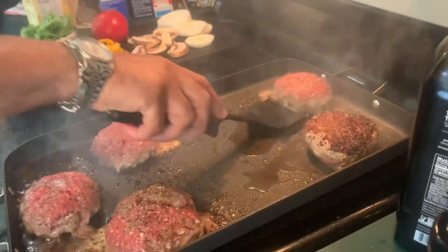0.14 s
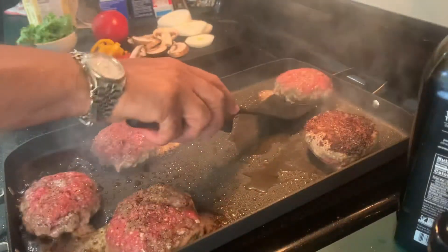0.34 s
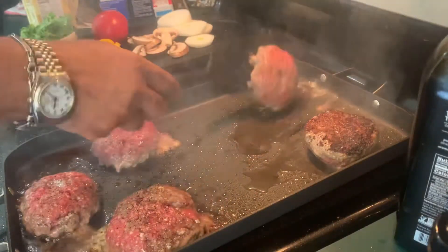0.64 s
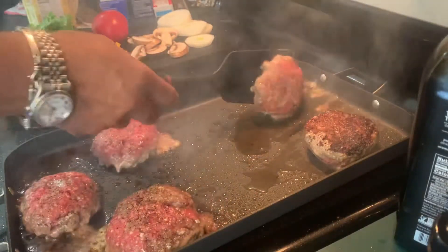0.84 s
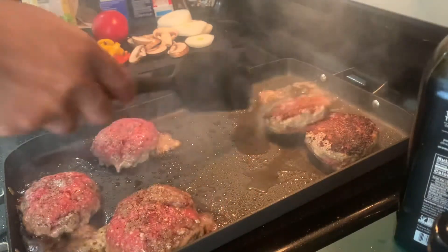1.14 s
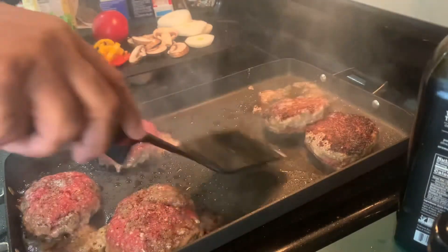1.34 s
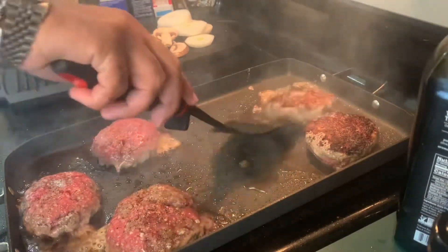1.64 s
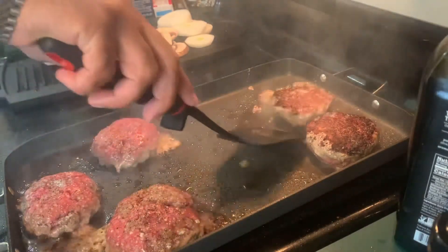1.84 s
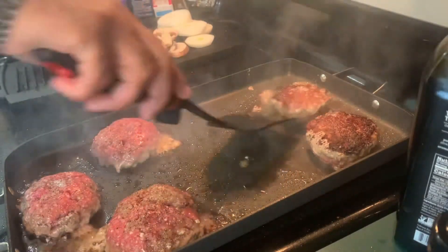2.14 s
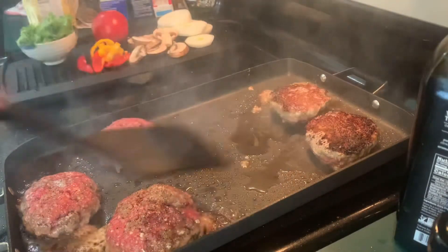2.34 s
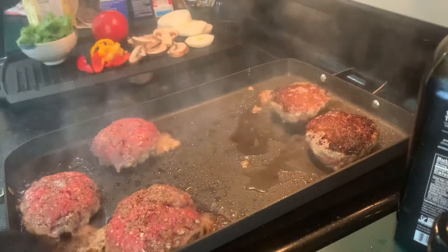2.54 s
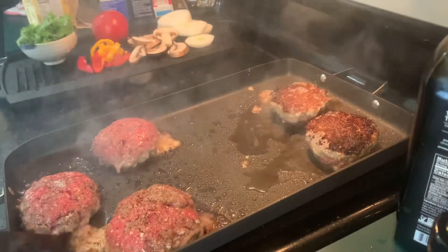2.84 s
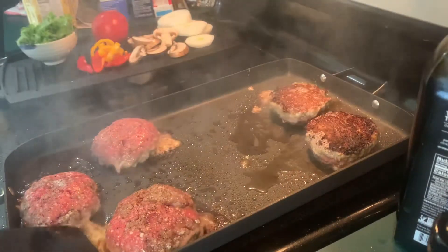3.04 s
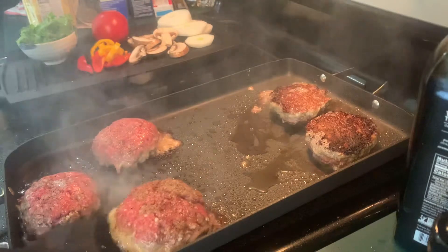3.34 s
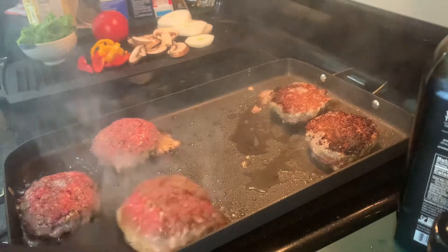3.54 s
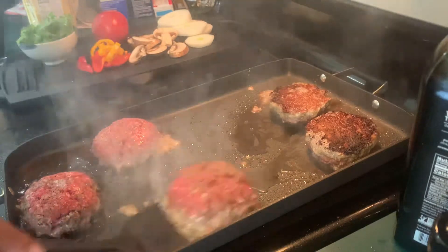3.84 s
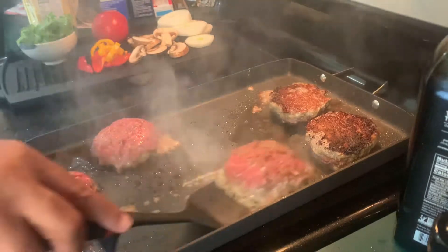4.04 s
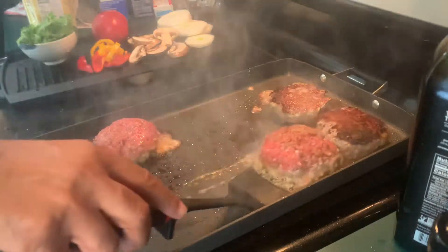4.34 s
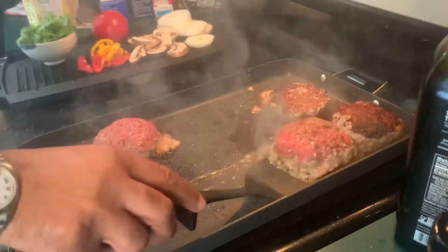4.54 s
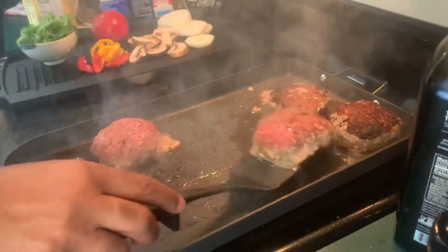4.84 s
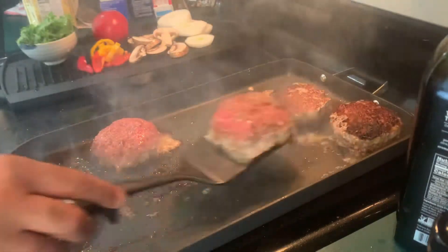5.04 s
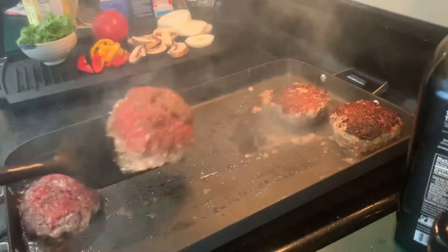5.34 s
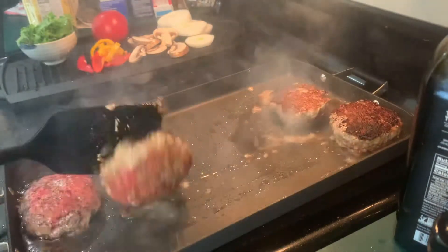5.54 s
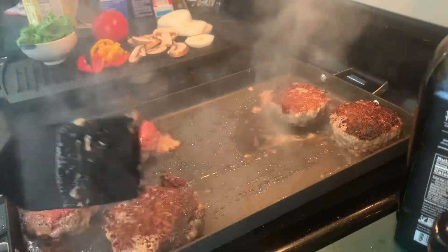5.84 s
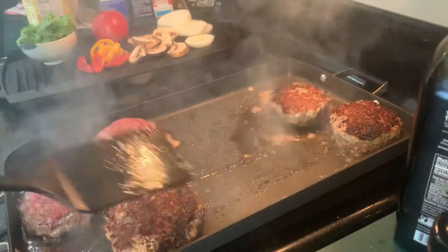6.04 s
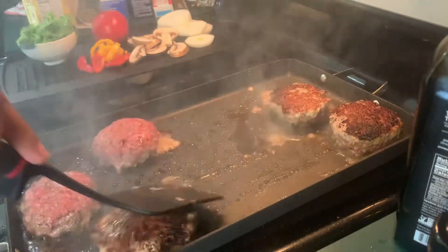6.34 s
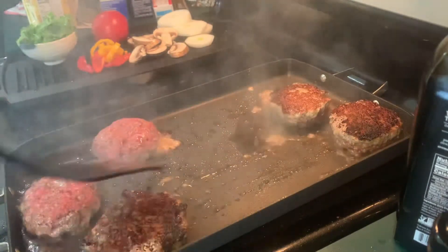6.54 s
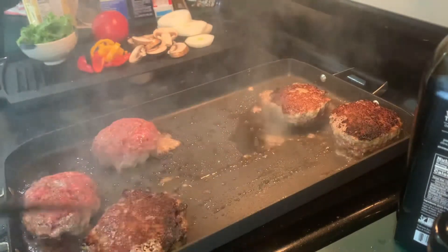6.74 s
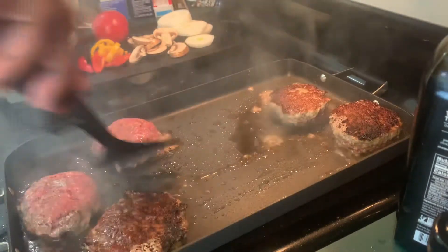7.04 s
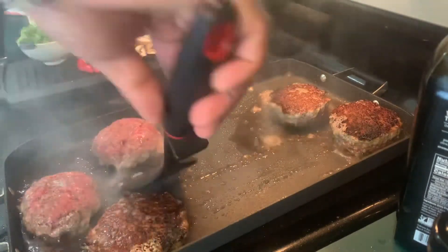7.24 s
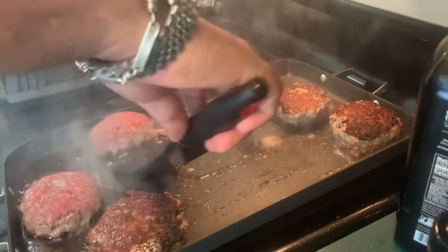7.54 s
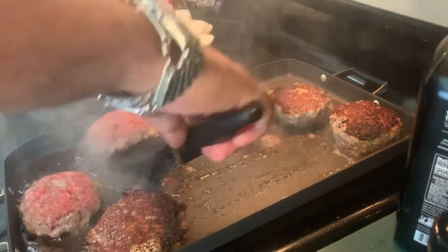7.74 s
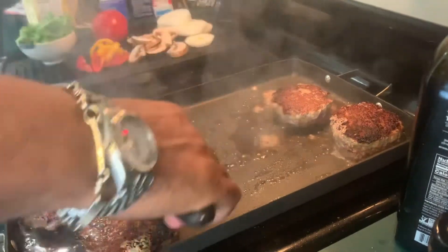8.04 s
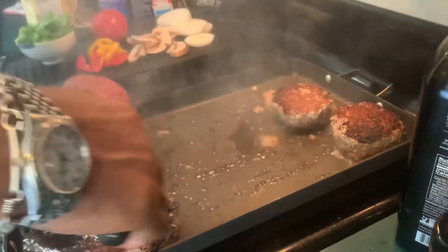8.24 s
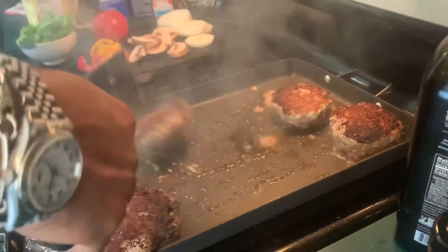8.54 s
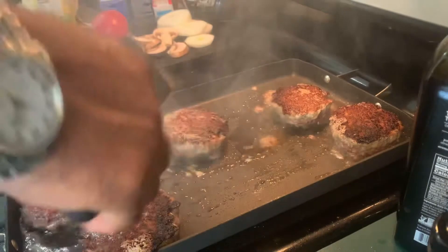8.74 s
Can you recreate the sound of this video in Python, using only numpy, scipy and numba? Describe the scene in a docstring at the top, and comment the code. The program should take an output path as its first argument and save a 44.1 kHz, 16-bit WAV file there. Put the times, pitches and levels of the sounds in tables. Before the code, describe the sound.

Meat patties sizzle fiercely on a hot griddle, fat spitting and crackling, with a spatula knock, scraping slide and bright steamy gushes over a humming hood.

```python
"""Meat patties sizzle on a hot griddle: thousands of steam bubbles burst in the fat as short swelling
sines, over filtered noise for the steady hiss; the largest spit out loud.
A kitchen hood adds shaped noise, duct resonances and mains hum. A spatula knock excites plate modes,
its slide under the meat is band-filtered noise, and juice on bare metal gushes as decaying bright noise.
One close microphone feeds both channels."""
import sys
import numpy as np
from scipy import signal
from scipy.fft import rfft, irfft, next_fast_len
from scipy.io import wavfile
from scipy.ndimage import uniform_filter1d
from numba import njit

SR = 44100
rng = np.random.default_rng(int(sys.argv[2]) if len(sys.argv) > 2 else 0)


def generate_wav(sig):
    """Save sig (samples, or channels by samples) to the path in sys.argv[1] as 16-bit PCM at SR."""
    pcm = np.round(np.clip(np.atleast_2d(sig).T, -1, 1) * 32767).astype(np.int16)
    wavfile.write(sys.argv[1], SR, pcm)


N = 392049
T = np.arange(N) / SR  # t/s

# boiling fat by bubble size, used about each column's mean:
# (t/s, middle bubbles level/dB, large bubbles above them level/dB, fine spray above them level/dB)
BOIL = [(0.0, -23.5, -3.5, 2.5), (0.6, -24, -9, 0), (0.89, -22, -8.5, 0.5), (1.14, -24, -7.5, -1),
        (1.65, -24, -6, 1.5), (2.42, -25, -7.5, 0.5), (3.1, -25, -5.5, 1.5), (3.6, -23, -5.5, 0.5),
        (4.06, -20.5, -5, -1), (4.33, -24, -2, 0.5), (5.25, -23, -7, 0.5), (5.7, -23.5, -3.5, 2),
        (6.38, -22.5, -6, 0), (6.9, -22.5, -6, 0), (7.45, -22, -5.5, -0.5), (8.3, -24, -4, 0.5),
        (8.62, -21, -5.5, -1), (8.89, -22, -4.5, -1)]
# pitches of large bubbles, middle bubbles and fine spray: (f/Hz, f/Hz, f/Hz)
BUBBLE_SIZE_HZ = (3500, 6800, 12000)
# relative spectrum of bubbles and steam: (f/Hz, level/dB per Hz)
SIZZLE = [(1000, -14), (1500, -6.5), (2200, -10.5), (3200, -6.5), (4500, -2.5), (5300, -1.5), (7600, 1),
          (10700, 0.5), (14000, 0.5), (15700, -1.5)]
# colouring by the raised rim and the microphone: (f/Hz, gain/dB)
RIM = [(2050, -2), (2250, -1.5), (2450, 1), (3250, 1), (3550, -0.5), (3850, 0), (4600, -1.5), (5150, 0),
       (5900, 0.5), (6200, -.5), (7500, 1.17), (11000, -1.5), (14000, -0.5), (15600, 1)]
# air pockets between meat and plate: (f/Hz, width/Hz, gain/dB)
POCKETS = [(2740, 120, -5.5), (3850, 210, -6.5), (5180, 330, -6.5)]
# reflections from rim, backsplash, hood and wall: (delay/ms, gain/dB)
ECHOES = [(2.6, -9), (6.2, -9.5), (11, -9), (19, -21)]

# relative spectrum of the hood's air rush: (f/Hz, level/dB per Hz)
HOOD_AIR = [(25, -30), (45, -21), (80, -23), (140, -11.5), (250, -8.5), (280, -17), (330, -13), (560, -14),
            (620, -11.5), (1200, -13), (2200, -16.5), (4000, -15), (6000, -44)]
HOOD_AIR_DB = -34  # rms
# resonances of the hood duct: (f/Hz, width/Hz, rms level/dB)
HOOD_DUCT = [(107.5, 21, -43), (174, 20, -52.5), (202.5, 12.6, -45.5), (628, 70, -51.5), (744, 90, -54),
             (976, 22, -50), (1148, 24, -50.5), (1363, 41, -46.5), (1555, 63, -49), (2010, 130, -45)]
# mains hum of the motor, about which each level wavers: (f/Hz, rms level/dB)
HOOD_HUM = [(120, -44.5), (240, -46.5), (360, -64), (480, -57), (600, -54), (720, -66)]

# loudest spits of fat, before pockets, echoes and rim: (t/s, peak level/dB, starting f/Hz)
SPITS = [(0.0933, -12, 4890), (0.1877, -9, 6980), (0.2726, -8, 4970), (0.514, -9.5, 5410),
         (0.6754, -9, 5700), (1.2784, -6, 4890), (1.3459, -6, 6630), (1.3855, -12, 4890),
         (1.5299, -8, 5140), (2.1363, -8, 5410), (2.1681, -8, 6310), (2.3533, -12, 5140),
         (2.4211, -11, 4650), (2.428, -9, 5140), (2.4796, -18, 2670), (2.5507, -12, 5700),
         (3.5277, -6, 5990), (4.0453, -12, 3600), (5.1428, -7, 5990), (5.2352, -7, 5410),
         (5.5204, -11, 4400), (5.6406, -13, 2940), (5.6797, -14, 3090), (5.7608, -8, 8550),
         (5.7973, -11, 5140), (5.841, -8, 4650), (5.9803, -11, 9000), (5.995, -13, 3990),
         (6.0062, -11, 3580), (6.1019, -6, 8550), (6.2329, -8, 7730), (6.3403, -10, 4700),
         (6.4017, -9, 5200), (6.4728, -6, 5140), (6.5326, -8.5, 4650), (6.6416, -8, 4890),
         (6.6587, -7, 5140), (6.6895, -9, 4890), (6.7959, -7, 3990), (6.8567, -7, 7730), (6.8798, -7, 3920),
         (6.9622, -5, 5140), (7.0527, -8, 5140), (7.0775, -10, 4650), (7.2685, -11, 4420),
         (7.3207, -8, 5140), (7.3974, -6, 5700), (7.4485, -9, 4450), (7.4656, -15, 3260),
         (7.4821, -10, 5410), (7.503, -9, 4670), (7.7722, -11.5, 2940), (7.7777, -7, 5700),
         (7.9151, -11, 4650), (8.347, -6, 9000), (8.427, -15, 2960)]
# further spits at random, in busier and calmer spells: (from t/s, to t/s, rate/s^-1)
SPATTER = [(0, 1.3, 7), (1.3, 2.9, 15), (2.9, 5.1, 1), (5.1, 6.9, 14), (6.9, 8.89, 3)]
SPATTER_DB, SPATTER_SPREAD_DB, SPATTER_HZ, SPATTER_OCTAVES = -16, 3, 4700, .12
SPIT_CYCLES = 1.09  # cycles to swell

# spatula striking the plate and rebounding: (t/s, relative strength/dB, push length/ms)
KNOCKS = [(.719, -2.5, 0.36), (.7234, -6.5, 0.68), (.7288, -7, 1.2), (.7385, -9, 0.83), (.746, -17, 1.2)]
# modes of blade and plate: (f/Hz, relative level/dB, t60/s)
PLATE = [(331, -6.5, 0.094), (444, -14.5, 0.13), (554, -11, 0.12), (636, -18, 0.084), (753, -8, 0.16),
         (776, -10, 0.19), (890, -22, 0.094), (1040, -8, 0.09), (1220, -13, 0.049), (1366, 1.5, 0.039),
         (1554, 6, 0.024), (1700, 2.5, 0.029), (1910, 4, 0.019), (2570, 0.5, .015)]
# the kitchen's rough after-ring: (f/Hz, width/Hz, level/dB, t60/s)
KNOCK_TAIL = [(756, 130, -27.5, 0.41), (1300, 900, -20, 0.075)]

# spatula sliding on the plate, with a hard shove under the patty: (t/s, level/dB)
SLIDE = [(3.08, -44), (3.74, -38), (3.96, -30.5), (4.18, -35.5), (4.84, -35.5), (5.28, -55)]
# bands in which the sliding blade sings: (f/Hz, width/Hz, relative level/dB)
SLIDE_BODY = [(1430, 210, -0.5), (1750, 280, -5), (1950, 170, 2.5), (905, 690, -5)]

# juice meeting bare hot metal: (t/s, hiss level/dB, centre f/Hz, t60/s, first flash above hiss level/dB)
GUSHES = [(5.418, -18, 9500, 0.7, 1), (7.045, -23, 8000, 0.44, -6), (8.408, -21, 8000, 0.8, -12)]
FLASH_T60_S = .07  # fade of the first flash of steam

TOP_HZ = 15720  # upper cutoff


def undb(db):
    """Amplitude ratio from its logarithmic level in dB."""
    return 10 ** (np.asarray(db) / 20)


def level(x, db):
    """Root-mean-square normalisation to a level in dB."""
    return x * undb(db) / np.sqrt(np.mean(x ** 2))


def shape(table, hz):
    """Spectral level in dB by interpolation on a logarithmic frequency axis."""
    f, db = np.transpose(table)
    return np.interp(np.log(np.maximum(hz, 1)), np.log(f), db)


def colour(x, db_of_hz):
    """Linear filtering: each Fourier component is scaled by a gain in dB."""
    size = next_fast_len(N)
    hz = np.arange(size // 2 + 1) * SR / size
    return irfft(rfft(x, size) * undb(db_of_hz(hz)), size)[:N]


def band(x, hz, width):
    """Second-order resonance, whose sharpness is centre frequency over bandwidth."""
    return signal.lfilter(*signal.iirpeak(min(hz, .45 * SR), hz / width, fs=SR), x)


def walk(rate):
    """Slow random fluctuation: levels held 1 / rate s and averaged twice; spread near 1."""
    hold = int(SR / rate)
    steps = np.repeat(rng.standard_normal(N // hold + 1), hold)
    return 1.3 * uniform_filter1d(uniform_filter1d(steps, hold), hold)[:N]


@njit
def rings(n, start, turn, swell, glide, size):
    """Transient oscillation: a sine swells for the given samples, then decays; its pitch glides up."""
    out = np.zeros(n)
    for k in range(len(start)):
        i, w = int(start[k]) + 1, turn[k]
        age = i - start[k]
        phase = w * age
        fade = np.exp(-1 / swell[k])
        # scaled so that the envelope peaks at size when age equals swell
        a = size[k] * np.exp(1 - age / swell[k]) / swell[k]
        while age < 7 * swell[k] and i < n:
            out[i] += a * age * np.sin(phase)
            phase += w
            w = min(w * glide[k], 2.8)
            a *= fade
            age += 1
            i += 1
    return out


def bubbles(s, hz, cycles, size, rise):
    """Bubble resonance: pitch rises by the share rise as the bubble opens over the given cycles."""
    swell = np.maximum(cycles, .4) * SR / hz
    return rings(N, s * SR, 2 * np.pi * hz / SR, swell, (1 + rise) ** (1 / swell), size)


def boil_db(s, hz):
    """Boiling activity by bubble size: level about its mean at a moment and a pitch."""
    t, mid, large, fine = np.transpose(BOIL)
    columns = (mid + large, mid, mid + fine)
    large_db, mid_db, fine_db = (np.interp(s, t, c - np.mean(c)) for c in columns)
    # -1 for large bubbles, 0 for middle ones, 1 for fine spray
    x = np.interp(np.log(hz), np.log(BUBBLE_SIZE_HZ), [-1, 0, 1])
    return mid_db + np.maximum(-x, 0) * (large_db - mid_db) + np.maximum(x, 0) * (fine_db - mid_db)


def crackle(count, lo_hz, hi_hz, scatter_db, cycles, db):
    """Random bubble bursts: a few exceed the rest, up to a fixed limit."""
    when, pitch, rarity, span = rng.random((count, 4)).T
    s = when * N / SR
    hz = lo_hz * (hi_hz / lo_hz) ** pitch
    extra_db = scatter_db * np.minimum(-np.log(1 - rarity), 4)
    size_db = shape(SIZZLE, hz) + 20 * np.log10(hz / 5000) + boil_db(s, hz) + extra_db
    return level(bubbles(s, hz, cycles * (.5 + span), undb(size_db), 0.029), db)


def steam(swell_db, flicker_db, db):
    """Turbulent hiss: third-octave noise bands sputter together and flicker alone."""
    out, swell = 0, walk(25)
    for hz in 1600 * 2 ** np.arange(0, 3.4, 1 / 3):
        noise = rng.standard_normal(N)
        noise = band(band(noise, hz, hz / 3), hz, hz / 3)
        band_db = shape(SIZZLE, hz) + boil_db(T, hz) + swell_db * swell + flicker_db * walk(14)
        out = out + noise * undb(band_db)
    return level(out, db)


def hood():
    """Flow noise and resonance: air rush, duct modes and the motor's wavering mains hum."""
    air = level(colour(rng.standard_normal(N), lambda hz: shape(HOOD_AIR, hz)), HOOD_AIR_DB)
    duct = sum(level(band(rng.standard_normal(N), hz, w), db) for hz, w, db in HOOD_DUCT)
    hum = 0
    for hz, db in HOOD_HUM:
        amplitude = np.sqrt(2) * undb(db + 0.78 * walk(5.0))  # sine peak from rms
        hum = hum + amplitude * np.sin(2 * np.pi * (hz * T + rng.random()))
    return air + duct + hum


def spits():
    """Impulsive bubble bursts: each pitched burst rides on a shorter, lower crack."""
    s = np.concatenate([rng.uniform(t0, t1, int(per_s * (t1 - t0))) for t0, t1, per_s in SPATTER])
    z = rng.standard_normal((len(s), 2)).T
    spatter_db = SPATTER_DB + SPATTER_SPREAD_DB * np.minimum(z[0], 1)
    spatter_hz = SPATTER_HZ * 2 ** (SPATTER_OCTAVES * z[1])
    s, db, hz = np.hstack([np.transpose(SPITS), (s, spatter_db, spatter_hz)])
    burst = bubbles(s, hz, SPIT_CYCLES, undb(db), 0.0092)
    crack = bubbles(s, 0.66 * hz, .55, undb(db - 16.0), 0.018)
    return burst + crack


def pockets(pops):
    """Cavity resonance: the larger bursts ring on in air pockets under the meat."""
    return pops + sum(undb(db) * band(pops, hz, w) for hz, w, db in POCKETS)


def echoes(pops):
    """Specular reflection: hard surfaces repeat the bursts a few ms later."""
    # np.roll carries the last few ms round to the start
    return pops + sum(undb(db) * np.roll(pops, int(ms * SR / 1000)) for ms, db in ECHOES)


def knocks():
    """Modal excitation: short pushes drive blade and plate; a longer push sounds duller."""
    push = np.zeros(N)
    for s, db, ms in KNOCKS:
        push += undb(db) / ms * np.exp(-.5 * ((T - s) / (ms / 4000)) ** 2)
    age = T[:SR // 4]
    ring = 0
    for hz, db, t60 in PLATE:
        # low modes swell in more slowly, the lowest over tens of ms
        build = 1 - np.exp(-age / (.005 * (700 / hz) ** 3))
        ring = ring + undb(db) * build * np.sin(2 * np.pi * hz * age) * 1000 ** (-age / t60)
    return undb(-33.5) * signal.fftconvolve(push, ring)[:N]


def knock_tail():
    """Reverberant decay: noise bands swell just after the first knock and fade exponentially."""
    age = np.maximum(T - KNOCKS[0][0], 0)
    out = 0
    for hz, w, db, t60 in KNOCK_TAIL:
        noise = level(band(rng.standard_normal(N), hz, w), db)
        out = out + noise * np.minimum(age / 0.0052, 1) * 1000 ** (-age / t60)
    return out


def slide():
    """Friction noise: the blade rasps unevenly over the plate and sings in a few broad bands."""
    s, db = np.transpose(SLIDE)
    rasp = rng.standard_normal(N) * undb(2.4 * walk(30.06))
    body = sum(undb(g) * band(rasp, hz, w) for hz, w, g in SLIDE_BODY)
    return level(body, 0) * undb(np.interp(T, s, db)) * (T > s[0]) * (T < s[-1])


def gushes():
    """Flash evaporation: sudden bright hiss with a short flash, then a slower decay."""
    out = np.zeros(N)
    for s, db, hz, t60, flash_db in GUSHES:
        age = np.maximum(T - s, 0)
        fade = 1000 ** (-age / t60) + undb(flash_db) * 1000 ** (-age / FLASH_T60_S)
        hiss = level(band(rng.standard_normal(N), hz, 0.76 * hz), db)
        out += hiss * np.minimum(age / 0.0017, 1) * fade
    return out


def scene():
    """Superposition: the rim-coloured sizzle adds to the spatula and hood sounds."""
    pops = crackle(count=900, lo_hz=2730, hi_hz=6320, scatter_db=2.0, cycles=0.91, db=-34.5) + spits()
    pops = echoes(pockets(pops))
    fizz = crackle(count=45000, lo_hz=1104, hi_hz=14920, scatter_db=2.0, cycles=1.29, db=-23.5)
    sizzle = pops + fizz + steam(swell_db=0.5, flicker_db=0.66, db=-20) + gushes()
    sizzle = colour(sizzle, lambda hz: shape(RIM, hz))
    mono = sizzle + hood() + knocks() + knock_tail() + slide()
    return np.array([mono, mono])


def record(dry):
    """Band limitation: one microphone on both channels, without deep bass and cut steeply at the top."""
    dry = signal.sosfilt(signal.butter(4, 40, "high", fs=SR, output="sos"), dry)
    return signal.sosfilt(signal.ellip(16, .3, 95, TOP_HZ, fs=SR, output="sos"), dry)


dry = scene()
out = record(dry)
generate_wav(out)
```